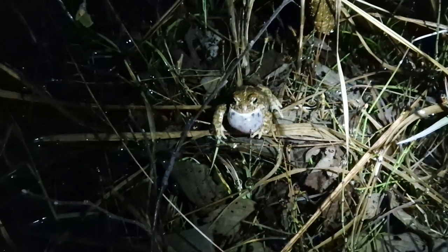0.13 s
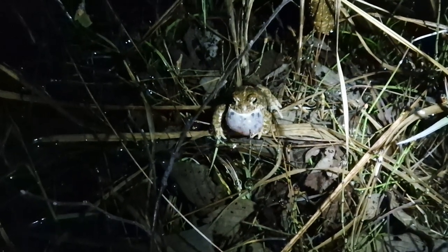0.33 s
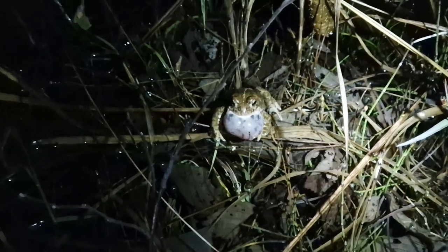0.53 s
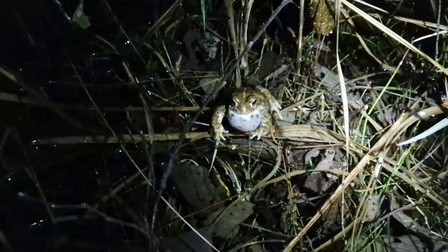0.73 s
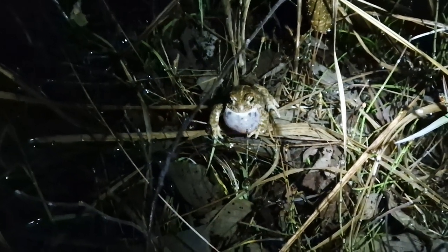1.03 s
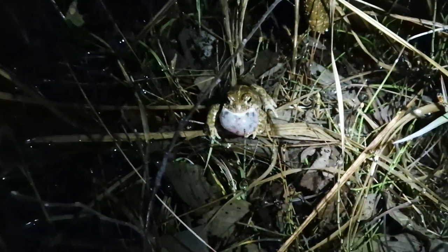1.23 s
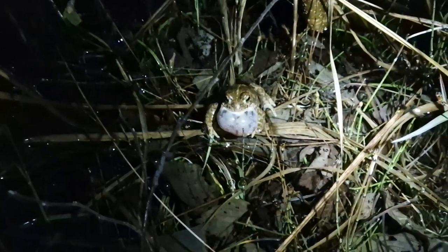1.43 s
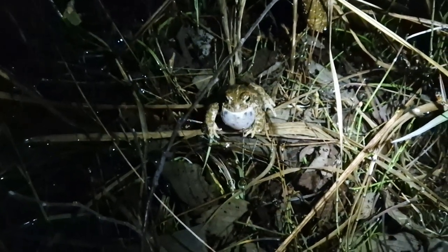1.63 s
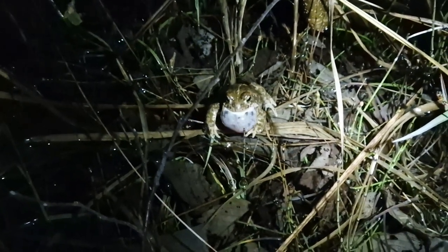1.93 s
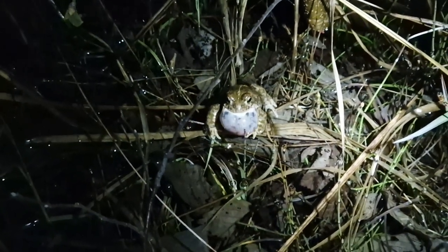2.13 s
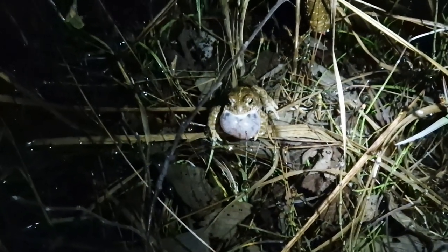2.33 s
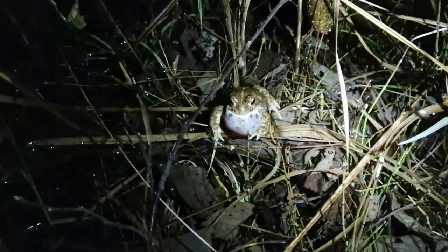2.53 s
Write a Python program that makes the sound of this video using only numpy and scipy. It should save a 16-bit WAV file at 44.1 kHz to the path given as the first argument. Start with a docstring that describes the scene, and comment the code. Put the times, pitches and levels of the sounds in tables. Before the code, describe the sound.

Close toad croaking in three rattling calls, over distant toads and faint night hiss.

```python
"""A distant toad ticks over faint night hiss; a moment later a toad close by rasps three calls
from the reeds of a pond, and another answers from further off. Each pulse is a forced resonance:
a few cycles of the larynx ring the vocal sac, whose note climbs through each of the near calls.
Three small ticks sound at the water's edge, and a faint low rumble swells late."""
import sys
import numpy as np
from scipy import signal
from scipy.fft import rfft, irfft
from scipy.io import wavfile
from scipy.ndimage import map_coordinates

SR = 44100
rng = np.random.default_rng(int(sys.argv[2]) if len(sys.argv) > 2 else 0)


def wav_record(signal):
    """Record a signal, one row per channel, as 16-bit PCM in the file named by sys.argv[1]."""
    frames = np.transpose(np.atleast_2d(signal))
    bounded = np.clip(frames, -1, 1)
    # unit amplitude maps onto the largest positive 16-bit level
    quanta = np.round(bounded * 32767).astype(np.int16)
    wavfile.write(sys.argv[1], SR, quanta)


N = 119070
PULSE_T = np.arange(2205) / SR
PITCH_JITTER = .006  # relative spread of a resonance from pulse to pulse


def undb(db):
    """Amplitude ratio of a level; all levels here are relative."""
    return 10 ** (np.asarray(db) / 20)


def between(start, end, share):
    """Linear interpolation."""
    return start + (end - start) * share


def butterworth(x, kind, hz, order):
    """Filter with a maximally flat passband."""
    return signal.sosfilt(signal.butter(order, hz, kind, fs=SR, output="sos"), x)


def add(out, start_s, sound):
    """Superposition: a sound sums into the mix from its start time."""
    i = int(start_s * SR)
    out[..., i:i + sound.shape[-1]] += sound[..., :N - i]


def delayed(x, ms):
    """Propagation delay, interpolated between samples."""
    return map_coordinates(x, [np.arange(N) - ms * SR / 1000], order=3)


def place(x, pan_db, lag_ms):
    """Direction by level and time difference: the right channel is pan_db down and lag_ms late."""
    return np.array([x, undb(-pan_db) * delayed(x, lag_ms)])


def decay(t60_s, t=PULSE_T):
    """Exponential damping, 60 dB in t60_s."""
    return np.exp(-np.log(1000) * t / t60_s)


def ring(hz, t60_s, attack_ms):
    """Free vibration of one damped mode, with a soft onset."""
    onset = 1 - np.exp(-1000 * PULSE_T / attack_ms)
    return np.sin(2 * np.pi * hz * PULSE_T) * decay(t60_s) * onset


# spectrum of the night air: frequency_hz, density_db
AIR_SPECTRUM = [(25, -2), (45, 4), (100, -7), (200, -19), (500, -22), (1000, -17), (1600, 3), (2500, -15),
                (4000, -18), (5000, -32), (10000, -40), (16000, -44)]
def night_air():
    """Spectrally shaped noise: a hiss in which remote toads blur into a peak at 1600 Hz."""
    hz, db = np.array(AIR_SPECTRUM).T
    bin_hz = np.maximum(np.arange(N // 2 + 1) * SR / N, 1)
    shape = undb(np.interp(np.log(bin_hz), np.log(hz), db))
    hiss = irfft(rfft(rng.standard_normal((2, N))) * shape, N)
    return undb(-65) * hiss / hiss.std()


# envelope of the rumble: time_s, level_db
RUMBLE_ENVELOPE = [(0.0, -82.5), (0.87, -71.5), (1.68, -73.5), (1.75, -61), (2.02, -62.5), (2.21, -49.5),
                   (2.42, -61.5), (2.46, -86.5), (2.62, -57.5), (2.7, -74)]
def rumble():
    """Amplitude modulation of low noise that is nearly in phase in both channels."""
    mid, side = butterworth(rng.standard_normal((2, N)), "band", (34.6, 60.4), order=2)
    level_db = np.interp(np.arange(N) / SR, *np.array(RUMBLE_ENVELOPE).T) - 2
    width = .25 * np.array([side, -side]) / side.std()
    return undb(level_db) * (mid / mid.std() + width)


def croak(larynx_hz, sac_hz, bandwidth_hz, burst_decay_ms):
    """Forced resonance: five fading larynx cycles drive the vocal sac; the peak is scaled to 1."""
    cycles = larynx_hz * PULSE_T
    burst = np.sin(2 * np.pi * cycles) * np.exp(-1000 * PULSE_T / burst_decay_ms) * (cycles < 5)
    hz = sac_hz * (1 + PITCH_JITTER * rng.standard_normal())
    sac = signal.lfilter(*signal.iirpeak(hz, hz / bandwidth_hz, fs=SR), burst)
    return sac / np.abs(sac).max()


def overtones(modes):
    """Modal superposition, each mode's level and pitch a little different at every pulse."""
    out = 0
    for hz, t60_s, db in modes:
        gain = undb(db + 3 * rng.standard_normal())
        pitch_hz = hz * (1 + PITCH_JITTER * rng.standard_normal())
        out += gain * ring(pitch_hz, t60_s, attack_ms=.56)
    return out


def rasp(low_hz, high_hz, t60_s, db):
    """Damped band noise: a short, rough flutter of air through the throat."""
    noise = rng.standard_normal(len(PULSE_T)) * decay(t60_s)
    bandwidth_gain = np.sqrt(.5 * SR / (high_hz - low_hz))
    return undb(db) * bandwidth_gain * butterworth(noise, "band", (low_hz, high_hz), order=5)


def carried(x):
    """Band-limited transmission: the middle of a voice's spectrum carries from afar."""
    return butterworth(x, "band", (1200, 4700), order=3)


# pulses of the distant toad: start_s, level_db
DISTANT_PULSES = [(0.0246, -29.5), (0.0482, -28.5), (0.0613, -33), (0.0741, -27.5), (0.0999, -28),
                  (0.1184, -30.5), (0.1253, -23), (0.2133, -25.5), (0.3034, -27.5), (0.408, -37),
                  (0.439, -43.5), (0.653, -30.5), (0.7698, -36), (0.7875, -28), (0.8218, -28),
                  (0.858, -30.5), (0.9993, -27.5), (1.0228, -25), (1.0521, -28), (1.0825, -29.5),
                  (1.1982, -24.5), (1.2852, -26), (1.6448, -33), (1.6704, -27.5), (1.6958, -29.5),
                  (1.7156, -27.5), (1.766, -28), (1.7865, -22), (1.9067, -27), (1.929, -28), (2.0846, -36),
                  (2.1095, -34), (2.2397, -40.5), (2.4692, -28), (2.5933, -28), (2.6169, -27),
                  (2.6471, -31), (2.6879, -28)]
# modes of its throat: pitch_hz, t60_s, level_db
DISTANT_MODES = [(2150, 0.013, -40), (3000, 0.017, -33.5), (3550, .015, -46.5)]
def distant_toad():
    """A steady sac resonance, the lowest of the three, excited in faint ticking pulses."""
    out = np.zeros(N)
    for start_s, db in DISTANT_PULSES:
        sac = croak(larynx_hz=1540, sac_hz=1490, bandwidth_hz=85, burst_decay_ms=1.5)
        pulse = carried(sac + overtones(DISTANT_MODES)) + rasp(2600, 3800, t60_s=.02, db=-43.5)
        add(out, start_s, undb(db - 1.5) * pulse)
    return place(out, pan_db=.67, lag_ms=-.13)


# thin whistles of the near toad: start_hz, end_hz, level_db, loudest_share, width_share
WHISTLE_MODES = [(11500, 9450, -39, .55, .3), (13300, 11580, -41, .74, .24), (15900, 14280, -39, .95, .15),
                 (16300, 15300, -40, .85, .15)]
def whistles(share):
    """High damped modes that sink and swell as share, the progress of a call, goes from 0 to 1."""
    out = 0
    for start_hz, end_hz, db, loudest, width in WHISTLE_MODES:
        swell = max(np.exp(-((share - loudest) / width) ** 2), undb(-21))
        gain = undb(db - 1 + 2 * rng.standard_normal())
        hz = between(start_hz, end_hz, share ** .7)
        out += gain * swell * ring(hz, t60_s=.022, attack_ms=1.2)
    return out


# spans over which the near toad's calls climb: start_s, end_s
CALLS = [(.134, 0.73), (.892, 1.797), (1.808, 2.73)]
# its pulses: start_s, level_db
CALL_PULSES = [(0.1339, -1.6), (0.15, -1.5), (0.1651, -0.5), (0.182, -0.5), (0.2016, -2), (0.233, -2.5),
               (0.258, -0.5), (0.2818, -1.1), (0.3142, -1.7), (0.3478, 0.1), (0.3666, -1.5), (0.3886, 0),
               (0.4191, -1.6), (0.4495, 0.9), (0.4675, 0), (0.487, -0.5), (0.5123, -1.7), (0.5419, -1.3),
               (0.5631, -1), (0.592, -2.1), (0.8917, -2.5), (0.9086, -2), (0.9265, -0.8), (0.9493, -1.7),
               (0.9845, -3.5), (1.0147, -1.1), (1.0354, -1.5), (1.0636, -1.8), (1.1032, -1.9), (1.1281, -1),
               (1.1547, -1.3), (1.1891, -2.7), (1.2229, -0.4), (1.2481, -0.6), (1.2704, -0.5), (1.2986, -1),
               (1.3264, -0.8), (1.3492, -0.1), (1.3736, -1), (1.3979, -1.1), (1.4305, -2), (1.4549, -1.2),
               (1.4879, -3), (1.808, -2), (1.8248, -2), (1.8427, -1.5), (1.8647, -2.2), (1.8968, -3),
               (1.9361, -0.6), (1.9619, -0.7), (1.9888, -0.8), (2.0206, -2.5), (2.0455, 0), (2.0674, -1),
               (2.0959, -1.0), (2.143, -0.9), (2.1704, -1), (2.198, -0.2), (2.2238, -0.5), (2.2543, -1.2),
               (2.2847, -1), (2.3154, -0.9), (2.3392, -0.2), (2.3646, -0.6), (2.3898, -1.2), (2.4196, -1.0),
               (2.446, -1.7)]
# modes of its throat: pitch_hz, t60_s, start_level_db, end_level_db
NEAR_MODES = [(520, .015, -51, -50.5), (785, 0.01, -60.5, -57.5), (1270, 0.06, -55, -51.5),
              (2092, 0.045, -42, -35), (2800, 0.018, -43.5, -40.5), (3150, .016, -36.5, -49),
              (3405, 0.012, -31.5, -22.5), (3844, .025, -44.5, -52), (5080, 0.023, -57.5, -51.5),
              (5154, 0.037, -51.5, -38), (5970, 0.008, -56.5, -58), (6187, 0.028, -49, -36),
              (6544, 0.0086, -30, -34), (6300, 0.029, -49, -48)]
def near_toad():
    """A shifting resonance: through each call the sac rings higher and the throat brightens."""
    sac, throat = np.zeros((2, N))
    for start_s, db in CALL_PULSES:
        begin_s, end_s = min(CALLS, key=lambda span: abs(start_s - np.mean(span)))
        share = np.clip((start_s - begin_s) / (end_s - begin_s), 0, 1)
        gain = undb(db - 2.5)
        decay_ms = 2.6 * undb(1.5 * rng.standard_normal())
        modes = [(hz, t60_s, between(*ends_db, share)) for hz, t60_s, *ends_db in NEAR_MODES]
        ringing = butterworth(overtones(modes), "low", 6670, order=8)
        sac_hz = between(1668, 1868, share) + 8 * db  # weaker pulses ring lower
        pulse = croak(larynx_hz=1677.6, sac_hz=sac_hz, bandwidth_hz=112.6, burst_decay_ms=decay_ms)
        flutter = rasp(2700, 6900, t60_s=.02, db=-50.5)
        add(sac, start_s, gain * pulse)
        add(throat, start_s, gain * (ringing + flutter + whistles(share)))
    direct = place(sac, pan_db=7.14, lag_ms=.16) + place(throat, pan_db=12, lag_ms=.094)
    stems = scatter(throat, t60_s=.03, db=-14)
    return bank_echoes(direct + stems)


# reflections in each channel: delay_ms, gain
LEFT_ECHOES = [(1.187, -.237), (1.798, .067), (3.461, -.035)]
RIGHT_ECHOES = [(2.768, -.248), (1.544, -.138)]
def bank_echoes(stereo):
    """Comb filtering: early reflections off the bank and stems interfere with the sound."""
    return np.array([x + sum(gain * delayed(x, ms) for ms, gain in echoes)
                     for x, echoes in zip(stereo, (LEFT_ECHOES, RIGHT_ECHOES))])


def scatter(x, t60_s, db):
    """Diffuse reflection: convolution with a decaying noise tail, different in each channel."""
    t = np.arange(SR // 2) / SR
    build_up = (1 - np.exp(-t / .004)) ** 2
    tail = rng.standard_normal((2, len(t))) * decay(t60_s, t) * build_up
    tail /= np.linalg.norm(tail, axis=1, keepdims=True)
    return undb(db) * signal.fftconvolve(x[None], tail, axes=1)[:, :N]


# pulses of the answering toad: start_s, level_db
ANSWER_PULSES = [(0.244, -20), (0.2709, -20.5), (0.3263, -30), (0.5188, -14.5), (0.5536, -18.5),
                 (0.6164, -18), (0.6597, -19), (0.6958, -18.5), (0.731, -18.5), (0.765, -18),
                 (0.8144, -17.5), (0.8469, -17.5), (0.9356, -18), (0.9612, -14.5), (1.0071, -20.5),
                 (1.1628, -31), (1.4084, -16), (1.4813, -15.5), (1.512, -19), (1.543, -18), (1.5742, -18.5),
                 (1.6096, -18), (1.6399, -18), (1.6914, -18), (1.7421, -18.5), (1.7753, -18.5),
                 (2.0538, -20.5), (2.4063, -19.5), (2.4318, -19), (2.4603, -22.5), (2.5482, -18.5),
                 (2.574, -17.5), (2.6031, -19.5), (2.6374, -19), (2.6833, -20)]
# modes of its throat: pitch_hz, t60_s, level_db
ANSWER_MODES = [(2000, .018, -28), (2780, 0.014, -37), (3560, 0.0078, -29.5), (4000, 0.015, -37.5),
                (4020, 0.024, -31), (6840, 0.037, -40)]
def answering_toad():
    """A steady sac resonance excited in pulses, with one faint high mode ringing above it."""
    out = np.zeros(N)
    whistle = undb(-50) * ring(9400, t60_s=.055, attack_ms=1.2)
    for start_s, db in ANSWER_PULSES:
        sac = croak(larynx_hz=1730, sac_hz=1700, bandwidth_hz=105, burst_decay_ms=1.7)
        pulse = carried(sac + overtones(ANSWER_MODES)) + rasp(3200, 4350, t60_s=.018, db=-33)
        add(out, start_s, undb(db - 3) * (pulse + whistle))
    return place(out, pan_db=5.9, lag_ms=-.05)


# ticks at the water's edge: start_s, pitch_hz, t60_s, level_db, snap_db, left_minus_right_db
EDGE_TICKS = [(0.7577, 1670, 0.0034, -21, -5, 21), (2.111, 1490, 0.0095, -39, -12, -2),
              (2.502, 1602, .012, -15.5, -12.5, 11.5)]
# hollow ring under each tick: pitch_hz, t60_s, level_db
HOLLOW_MODES = [(860, .03, -36), (1030, .035, -30), (1230, .035, -28), (2950, .02, -33), (6050, .02, -42)]
def ticks():
    """Damped transients: a short pip with a dull snap of noise, over longer hollow modes."""
    out = np.zeros((2, N))
    for start_s, hz, t60_s, db, snap_db, pan_db in EDGE_TICKS:
        pip = butterworth(ring(hz, t60_s, attack_ms=.83), "band", (650, 3500), order=3)
        noise = rng.standard_normal(len(PULSE_T)) * decay(t60_s)
        snap = undb(snap_db) * butterworth(noise, "band", (650, 3300), order=3)
        tick = pip / np.abs(pip).max() + snap + overtones(HOLLOW_MODES)
        add(out, start_s, undb([[db], [db - pan_db]]) * tick)
    return out


def scene():
    """Superposition of the sources, the reverberation of their left channel, and the background."""
    sources = near_toad() + answering_toad() + distant_toad() + ticks()
    reeds = scatter(sources[0], t60_s=.024, db=-23)
    open_air = scatter(sources[0], t60_s=.15, db=-26.5)
    return sources + reeds + open_air + night_air() + rumble()


def record(dry):
    """Band limiting: a steep elliptic low-pass cuts the treble above 16.4 kHz."""
    return signal.sosfilt(signal.ellip(8, .2, 70, 16400, fs=SR, output="sos"), dry)


dry = scene()
out = record(dry)
wav_record(out)
```